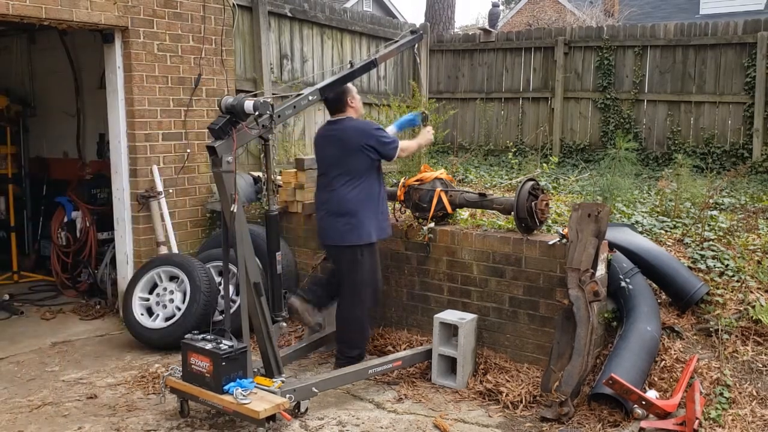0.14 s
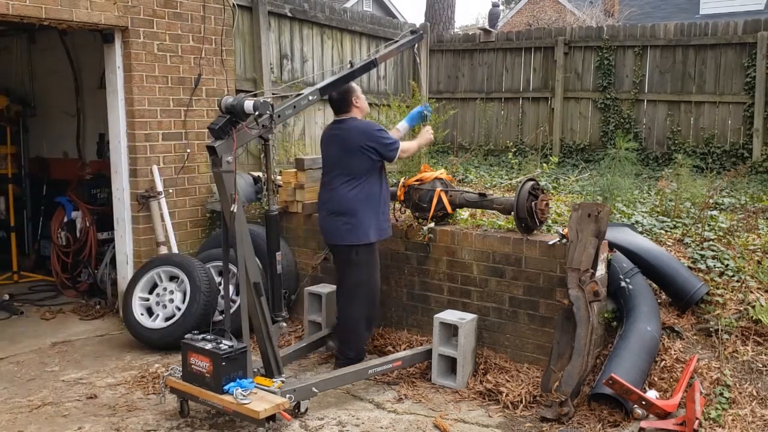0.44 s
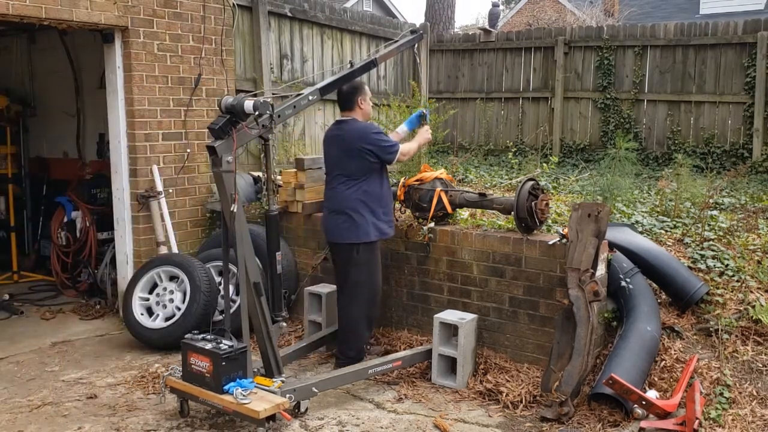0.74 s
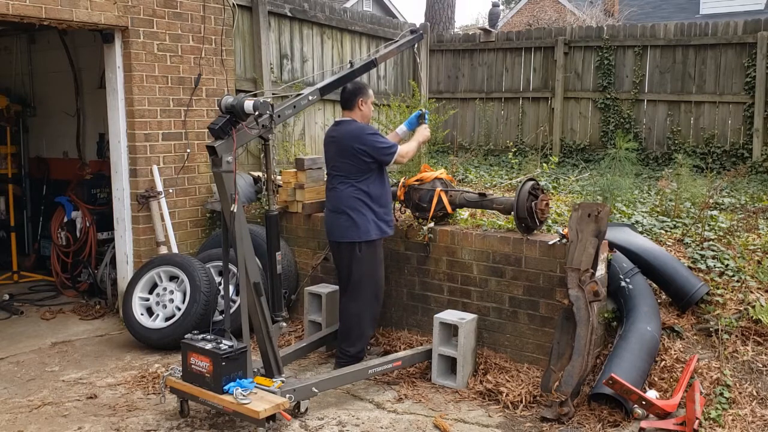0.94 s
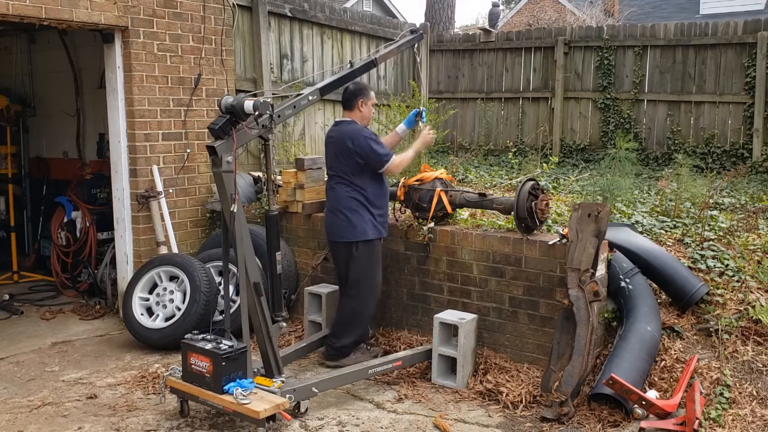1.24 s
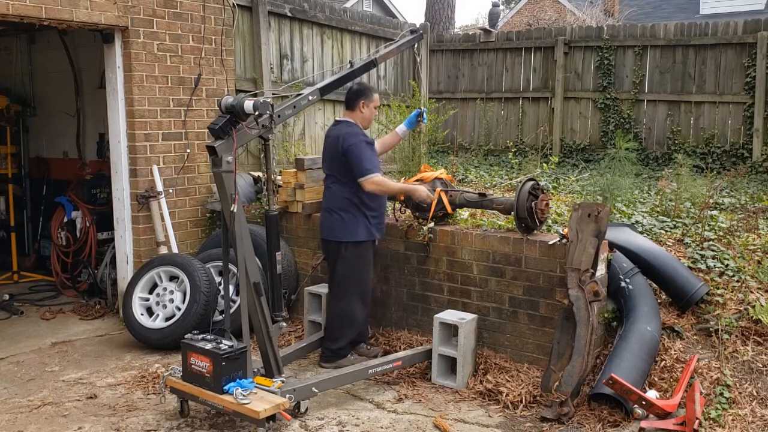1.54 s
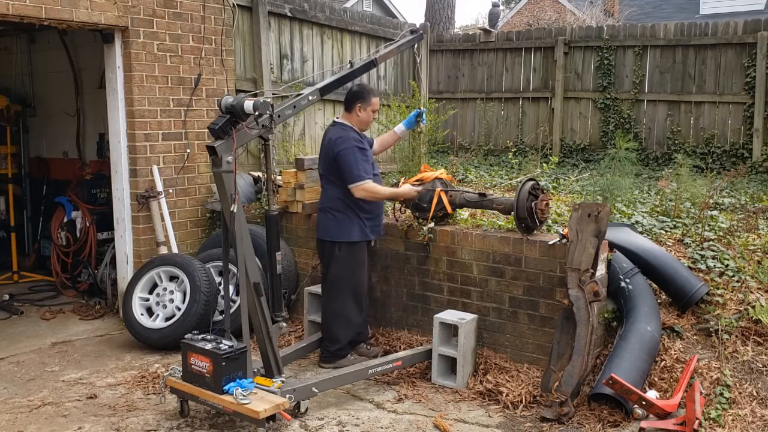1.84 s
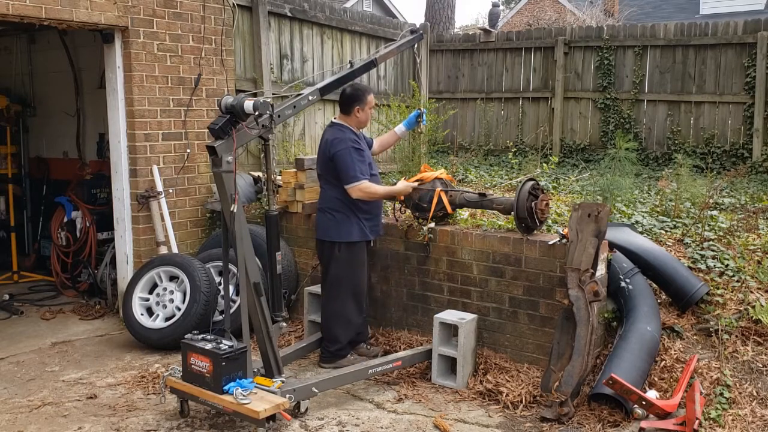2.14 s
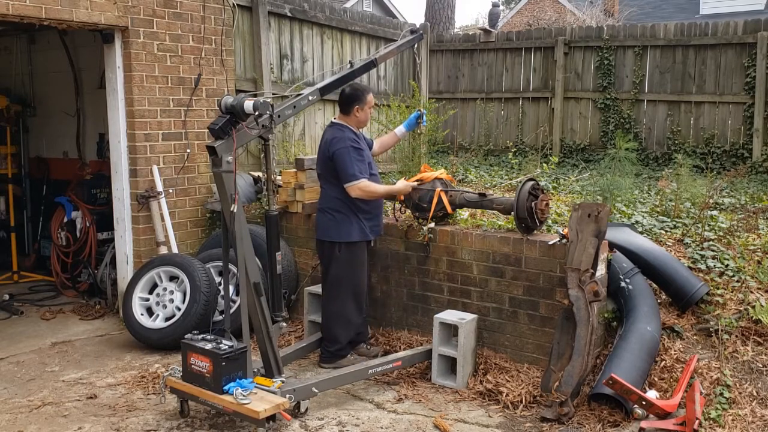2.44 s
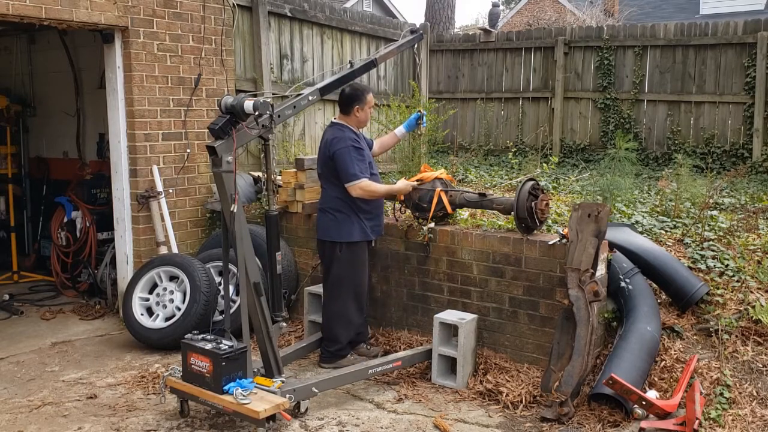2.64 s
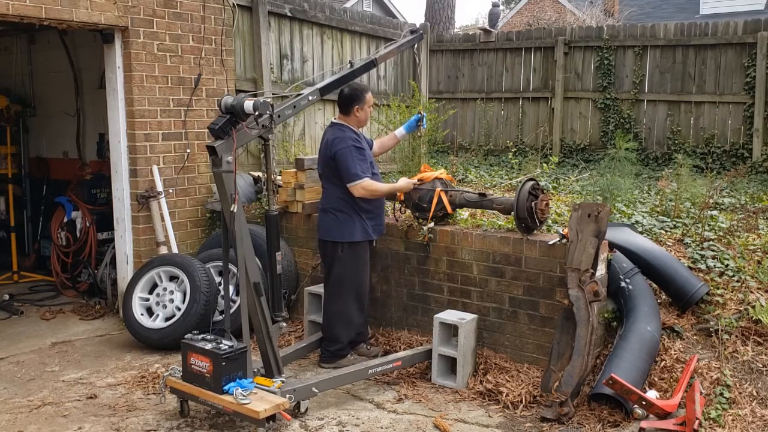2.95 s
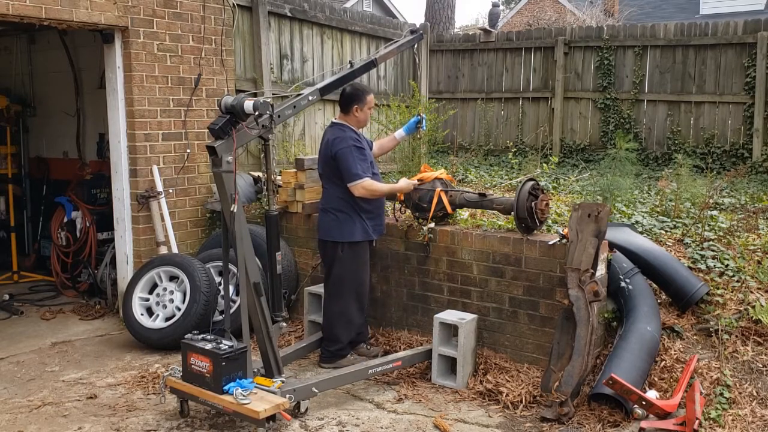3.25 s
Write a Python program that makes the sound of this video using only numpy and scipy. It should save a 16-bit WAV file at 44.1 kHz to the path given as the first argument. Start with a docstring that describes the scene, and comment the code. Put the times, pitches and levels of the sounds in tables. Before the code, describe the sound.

An electric winch jerks briefly, then after strap rustles and hook clinks whirs steadily to the end.

```python
"""An electric winch on a shop crane in a yard by a garage, in light wind that buffets the microphone, mostly on the left.
First the motor gives a short jab: coloured noise jolts over a decaying ring of the housing.
A shoe is set down softly, straps slide and rustle as swelling noise, a steel hook clinks as struck modes, rigging ticks.
Then the switch snaps and the winch spins up to a steady whir: gear-coloured noise and shaft-rate multiples
rattle the housing, under a thin mesh whine of sines."""
import sys
import numpy as np
from scipy import signal
from scipy.fft import rfft, irfft, next_fast_len
from scipy.io import wavfile
from scipy.ndimage import uniform_filter1d, map_coordinates

SR = 44100
rng = np.random.default_rng(int(sys.argv[2]) if len(sys.argv) > 2 else 0)


def generate_wav(sig):
    """Save sig (samples, or channels by samples) to the path in sys.argv[1] as 16-bit PCM at SR."""
    pcm = np.round(np.clip(np.atleast_2d(sig).T, -1, 1) * 32767).astype(np.int16)
    wavfile.write(sys.argv[1], SR, pcm)


N = 149940  # samples
SHAFT_HZ = 31.07  # full speed of the winch shaft

# Broad colour of the gear rattle: f/Hz, relative level/dB
GEAR_COLOUR = [(200, -16.5), (300, -12), (430, -15), (520, -10.5), (720, -6), (950, -4), (1500, 0),
               (2200, -3.5), (2800, -0.5), (3400, 1), (4200, 0.5), (4800, -5.5), (5600, -3.5), (7300, -4),
               (8000, -10), (10500, -11.5), (13000, -15.5), (15500, -18.5)]
# Left-right likeness of the winch noise: f/Hz, correlation [-1..1]
WINCH_ALIKE = [(200, 0.94), (800, 0.83), (2000, 1), (4000, 0.45), (12000, 0.18)]
# Stereo balance of the winch noise: f/Hz, left over right level/dB
WINCH_PAN = [(200, 1), (700, 2.5), (1290, 9.5), (2200, 6), (2950, -6.5), (3300, 2), (4400, -6), (5600, 2),
             (6300, -2), (7200, 4.5), (8500, -1), (13000, -0.5)]
# Left-right likeness of straps and rigging: f/Hz, correlation [-1..1]
RUSTLE_ALIKE = [(300, 0.68), (3000, 0.26), (12000, 0.14)]
# Stereo balance of straps, rigging and shoe: f/Hz, left over right level/dB
RUSTLE_PAN = [(300, -5), (1300, 8), (4400, 0), (15000, -3)]


def amp(db):
    """Decibels to gain."""
    return 10 ** (np.asarray(db) / 20)


def unit(x):
    """Scaled to rms 1."""
    return x / np.sqrt(np.mean(x ** 2) + 1e-20)


def along(points, hz):
    """Values of (f/Hz, value) points, joined on a log frequency axis."""
    f, v = np.transpose(points)
    return np.interp(np.log(hz + 1), np.log(f + 1), v)


def clock():
    """The time of each sample in seconds."""
    return np.arange(N) / SR


def curve(rows):
    """(t/s, value) rows joined by lines."""
    return np.interp(clock(), *np.transpose(rows))


def wobble(rate):
    """A smooth random curve, rate knots a second."""
    knots = rng.standard_normal(int(N * rate / SR) + 4)
    return map_coordinates(knots, [clock() * rate])


def filtered(x, response):
    """x shaped by a response of frequency."""
    m = next_fast_len(N + SR // 2)
    spectrum = rfft(x, m) * response(np.fft.rfftfreq(m, 1 / SR))
    return irfft(spectrum, m)[..., :N]


def rush(colour, alike, pan, lift=lambda hz: 0):
    """Stereo noise of rms 1 with a colour, a left-right likeness and a balance; lift adds dB."""
    def mid_side(hz):
        turn = np.arccos(np.clip(along(alike, hz), -1, 1)) / 2
        return amp(along(colour, hz) + lift(hz)) * [np.cos(turn), np.sin(turn)]

    mid, side = filtered(rng.standard_normal((2, N)), mid_side)
    left_right = np.array([mid + side, mid - side])
    return unit(filtered(left_right, lambda hz: amp(np.outer([.5, -.5], along(pan, hz)))))


def swell(s, db, attack, fall):
    """A bell-shaped rise to a peak at s, then a steady fall in dB per second."""
    t = clock() - s
    rise = np.exp(-.5 * (np.minimum(t, 0) / attack) ** 2)
    return amp(db - fall * np.maximum(t, 0)) * rise


def wind():
    """Gusts thump on the microphone ports as low noise, over a faint outdoor background."""
    # Buffeting colour before a low-pass at 550 Hz: f/Hz, relative level/dB
    buffet_colour = [(13, -47), (22, -3), (43, -4), (70, -3), (122, -11.5), (198, -29), (340, -42.5),
                     (500, -59), (1100, -120)]
    # Balance of the buffeting: f/Hz, left over right level/dB
    wind_pan = [(60, 14.5), (130, 7.6), (300, 3)]
    # Gusts before the wind trim: t/s, level/dB, time from peak to 1/e of the power/s
    gust_rows = [(0.061, -39, 0.036), (0.531, -36, 0.045), (.635, -28, 0.013), (0.704, -34.5, 0.028),
                 (0.796, -29.5, 0.028), (.87, -37, 0.084), (0.936, -25.5, 0.012), (0.992, -34, 0.015),
                 (1.488, -26.5, 0.0092), (1.632, -27, .014), (1.709, -31, 0.031), (1.82, -35.5, 0.02),
                 (1.913, -27.5, 0.0083), (2.004, -31.5, 0.035), (2.126, -27.5, 0.021),
                 (2.225, -29.5, 0.012), (2.55, -39.5, 0.049), (2.8, -43.5, 0.092), (3.2, -52.5, .015)]
    # Outdoor background: f/Hz, relative level/dB
    air_colour = [(88, -35), (150, -4.5), (279, -11), (530, -21), (1910, -36.5), (2500, -40), (7410, -49.5),
                  (8330, -70), (11000, -40.5), (15500, -39)]
    breeze_db, wind_db, air_db = -47, 3, -59.5  # floor between gusts, wind trim, background level
    evenness, cut_hz = .35, 36  # share of chance swings smoothed away; bass cut

    buffet = rush(buffet_colour, [(60, .25)], wind_pan, lambda hz: -10 * np.log10(1 + (hz / 550) ** 6))
    power = np.mean(buffet ** 2, axis=0)
    for _ in range(2):
        power = uniform_filter1d(power, size=900)
    buffet = unit(buffet / (np.abs(power) + 1e-9) ** (evenness / 2))
    gust_power = sum(amp(db) ** 2 * np.exp(-((clock() - s) / width) ** 2) for s, db, width in gust_rows)
    gusts = np.sqrt(amp(breeze_db) ** 2 + gust_power)
    thumps = filtered(amp(wind_db) * gusts * buffet, lambda hz: hz ** 4 / (hz ** 4 + cut_hz ** 4))
    air = rush(air_colour, [(200, .94), (2000, .13), (10000, .1)], [(1000, 1)])
    return thumps + amp(air_db) * air


def footstep():
    """A shoe is set down softly: one short swell of dull, low noise."""
    # The step: t/s, level/dB, attack/s, fall/(dB per s)
    step_row = (.405, -53, .007, 350)
    # Its colour: f/Hz, relative level/dB
    step_colour = [(100, -9), (250, -2), (400, 1), (700, -24), (3000, -33), (10000, -53)]
    return swell(*step_row) * rush(step_colour, WINCH_ALIKE, RUSTLE_PAN)


def ticks():
    """Slack rigging knocks lightly: brief bursts of dull noise."""
    # Ticks: t/s, level/dB, attack/s, fall/(dB per s)
    tick_rows = [(1.178, -47.5, 0.0023, 600), (1.25, -52, 0.0022, 703), (1.421, -55, 0.0029, 700),
                 (1.767, -63.5, 0.0022, 495), (1.945, -67, 0.0031, 696)]
    # Their colour: f/Hz, relative level/dB
    tick_colour = [(300, -5), (1200, -12), (2600, -10.5), (5000, -21), (8000, -24), (15000, -13)]
    return sum(swell(*row) for row in tick_rows) * rush(tick_colour, RUSTLE_ALIKE, RUSTLE_PAN)


def straps():
    """Sliding webbing and cloth: a grainy hiss with scattered snags, over a duller body."""
    # Rustles before grain and snags: peak t/s, hiss level/dB, attack/s, fall/(dB per s), body over hiss level/dB
    rustle_rows = [(0.412, -66, 0.048, 50, -7.5), (0.564, -41, 0.0091, 75, -34),
                   (0.647, -44, 0.043, 94, -3), (.98, -67, 0.029, 37, -12), (1.176, -48, 0.041, 157, -10.5),
                   (1.21, -57.5, 0.04, 109, -2.5), (1.351, -35.5, 0.0073, 850, -10.5),
                   (1.369, -52.5, 0.038, 124, -3), (1.53, -54, 0.026, 118, -10)]
    # Bright hiss: f/Hz, relative level/dB
    hiss_colour = [(1000, -28), (3500, -15), (5500, -11), (7200, 3), (8500, -14.5), (10500, 1.5),
                   (12000, 8.5), (15500, 5.5)]
    # Duller body: f/Hz, relative level/dB
    body_colour = [(200, -10), (500, 0), (900, -5.5), (1600, -1), (2600, -2), (4000, -2.5), (7000, -0.5),
                   (12000, -7)]
    grain_db, snags_per_s, snag_s, snag_db = .5, 140, .0013, -14  # snag_s: decay to 1/e

    hiss_power = sum(swell(s, db, attack, fall) ** 2 for s, db, attack, fall, body in rustle_rows)
    body_power = sum(swell(s, db + body, attack, fall) ** 2 for s, db, attack, fall, body in rustle_rows)
    grain = unit(amp(grain_db * wobble(900) + .71 * wobble(70.64)))
    snag_hits = 1. * (rng.random(N) < snags_per_s / SR)
    snags = unit(signal.lfilter([1], [1, -np.exp(-1 / (snag_s * SR))], snag_hits))
    hiss = np.sqrt(hiss_power) * rush(hiss_colour, RUSTLE_ALIKE, RUSTLE_PAN)
    body = np.sqrt(body_power) * rush(body_colour, RUSTLE_ALIKE, RUSTLE_PAN)
    return (grain + amp(snag_db) * snags) * (hiss + body)


def hook():
    """Touches ring the hook's modes, blurred by chatter; light ones are duller; wall and fence answer."""
    # Touches before the hook trim: t/s, low-tone level/dB, middle-tone level/dB, high-tone level/dB
    clink_rows = [(1.25, -53, -45.5, -53), (1.254, -52, -55, -37.5), (1.257, -41, -43, -50),
                  (1.269, -57, -57, -60), (1.284, -46, -64, -55), (1.458, -53, -76, -52),
                  (1.489, -61, -79, -76), (1.511, -60, -72, -68), (1.525, -46.5, -59, -45.5),
                  (1.558, -55, -70, -69), (1.593, -63, -78, -72), (1.633, -65, -80, -80),
                  (1.652, -65, -82, -80)]
    # Modes of the steel: f/Hz, relative level/dB, t60/s
    hook_modes = [(1780, -11, 0.025), (3128, 1.5, 0.039), (3277, -3.5, 0.062), (4390, 3, 0.033),
                  (6700, -7.5, 0.045), (7450, -1, 0.04), (9870, 2, 0.037), (11870, -1, 0.035)]
    hook_db, attack_s = 2.5, .001
    soft_dulling = 1.7  # dB lost from 7.5 to 15 kHz for each dB below the hardest touch
    chatter_hz, chatter_turns = 200, .14  # knots a second and depth of the random phase
    crack_db, crack_t60_s = -2.5, .018  # noise of the contact
    yard_db, yard_t60_s = -6.5, .2  # echo

    out, t = np.zeros((2, N + SR)), np.arange(SR // 2) / SR
    hardest = max(row[3] for row in clink_rows)
    for s, low, middle, high in clink_rows:
        top = high - soft_dulling * (hardest - high)
        touch = [(3300, low), (4400, middle), (6500, high), (7500, high), (15000, top)]
        ring = 0
        for hz, db, t60 in hook_modes:
            level = amp(db + along(touch, hz) + rng.normal(0, 1) - 60 * t / t60)
            chatter = chatter_turns * wobble(chatter_hz)[:len(t)]
            turns = hz * t + chatter + .66 * rng.random((2, 1))
            ring = ring + level * np.sin(2 * np.pi * turns)
        crack = amp(max(middle, high) + crack_db - 60 * t / crack_t60_s) * rng.standard_normal((2, len(t)))
        clink = ring * (1 - np.exp(-t / attack_s)) + crack
        tail = rng.standard_normal((2, len(t))) * amp(-60 * t / yard_t60_s)
        echo = signal.fftconvolve(clink, tail / np.linalg.norm(tail[0]), axes=1)[:, :len(t)]
        out[:, round(s * SR):][:, :len(t)] += amp(hook_db) * (clink + amp(yard_db) * echo)
    return out[:, :N]


def housing(hz):
    """Lift in dB from the resonances of the winch housing and crane, and the hollows between them."""
    # Resonances before sharpening: f/Hz, width/Hz, lift/dB
    resonances = [(528, 22, 5), (591, 22, 6), (878, 22, 6), (940, 20, 4), (1035, 25, 3), (1185, 22, 4),
                  (1690, 50, 3.5), (2010, 60, 3.5), (2383, 25, 4), (2630, 55, 5.5), (2955, 50, 4.5),
                  (3172, 24, 6), (3305, 28, 8), (3592, 42, 6), (3854, 42, 6.5), (4014, 28, 4),
                  (4475, 50, 5), (5520, 130, 6), (6277, 36, 8), (6810, 80, 5), (7257, 50, 5),
                  (11800, 300, 4)]
    # Hollows: f/Hz, width/Hz, lift/dB
    hollows = [(690, 30, -5), (770, 25, -4), (972, 24, -8), (1375, 30, -4), (1860, 40, -4), (2300, 25, -4),
               (3675, 32, -7), (5350, 110, -5), (5640, 35, -6)]
    trim_db, sharpen = -1.5, 1.45

    def bumps(rows):
        return sum(db / (1 + (2 * (hz - f) / width) ** 2) for f, width, db in rows)

    return trim_db + sharpen * bumps(resonances) + bumps(hollows)


def jab():
    """A brief jerk of the motor jolts the gears and leaves the housing ringing."""
    # Jolts: t/s, level/dB, attack/s, fall/(dB per s)
    jolt_rows = [(.003, -42.5, 0.0027, 178), (0.021, -35.5, 0.0024, 350), (.112, -52, 0.005, 260)]
    # Their colour before the housing lift: f/Hz, relative level/dB
    jolt_colour = [(200, -19.5), (420, -12), (590, -6.5), (750, -3), (1200, -10), (1900, -1.5),
                   (2500, -1.5), (3400, 2), (4200, -2), (4800, -11.5), (7400, -7), (8200, -21.5),
                   (15500, -14.5)]
    # Housing ring: f/Hz, peak level/dB before the onset fade, t60/s
    ring_modes = [(592, -37.5, .13), (860, -44, .09), (1520, -44, .09), (1906, -41, .13), (2164, -38, .09),
                  (3058, -38, .12), (3558, -37, .13), (4091, -41, .11), (7200, -49, .12)]

    t = np.maximum(clock() - .018, 0)  # s since the ring began
    ring = sum(amp(db - 60 * t / t60) * np.sin(2 * np.pi * hz * t + .5 * wobble(87))
               for hz, db, t60 in ring_modes)
    ring = ring * (1 - np.exp(-t / .0016))
    jolts = sum(swell(*row) for row in jolt_rows)
    return ring + jolts * rush(jolt_colour, WINCH_ALIKE, WINCH_PAN, housing)


def relay():
    """The motor switch snaps: a short burst of bright noise."""
    # Snaps: t/s, level/dB, attack/s, fall/(dB per s)
    snap_rows = [(2.041, -44, 0.0046, 301)]
    # Their colour: f/Hz, relative level/dB
    snap_colour = [(300, -21.5), (1400, -12.5), (4000, -16.5), (7300, 1.5), (8500, 3), (15000, -0.5)]
    return sum(swell(*row) for row in snap_rows) * rush(snap_colour, WINCH_ALIKE, WINCH_PAN)


def ripple(hz):
    """Fine steady peaks and dips in dB, from reflections off wall and ground."""
    spacing_hz, depth_db = 19, 1.6
    knots = np.arange(0, SR / 2, spacing_hz)
    return depth_db * np.interp(hz, knots, rng.standard_normal(len(knots)))


def knocks():
    """Gain of the rattle: now and then a tooth takes up its slack and hits harder."""
    per_s, decay_s, depth = 70, .0016, .75
    hits = (rng.random(N) < per_s / SR) * (.5 + rng.random(N))
    return unit(1 + depth * signal.lfilter([1], [1, -np.exp(-1 / (decay_s * SR))], hits))


def gear_train(angle):
    """Fluttering tones on the multiples of the shaft rate, coloured by the housing, at rms 1."""
    flutter_db, jitter, housing_share = 4, 1.2, .55  # jitter in radians
    t, knots = clock(), np.arange(0, N / SR + 1, 1 / 28)

    def chance():
        return np.interp(t, knots, rng.standard_normal(len(knots)))

    orders = np.arange(16, 146)
    hz = orders * SHAFT_HZ
    gains = amp(along(GEAR_COLOUR, hz) + housing_share * housing(hz))
    tones = 0
    for k, gain in zip(orders, gains):
        level = gain * amp(flutter_db * chance())
        phase = k * angle + 2 * np.pi * rng.random() + jitter * chance()
        tones = tones + level * np.sin(phase)
    return unit(tones)


def running():
    """The shaft spins up; tooth rattle swells once a turn and the mesh whines on multiples of its rate."""
    # Running level before the rattle and whine trims: t/s, level/dB
    run_level = [(2.036, -56), (2.047, -42.5), (2.082, -32), (2.228, -28), (3.062, -31), (3.184, -33),
                 (3.206, -30.5), (3.22, -32), (3.4, -33)]
    # Mesh whine before its trim: multiple of the shaft rate, level over the running level/dB
    mesh_tones = [(32, -20.5), (48, -17.3), (95, -15.5), (143.5, -22)]
    start_s, spin_up_s, wander = 2.036, .036, .001  # switch-on, time constant, share of speed
    orders_db, rattle_db, whine_db = -5.5, 2, 1.8
    rough_db, sway_db, grind_db, flutter_db = -1, .35, -.44, 2.2  # depths of the random level swings
    turn_depth = .09

    age = np.maximum(clock() - start_s, 0)
    speed = (1 - np.exp(-age / spin_up_s)) * (1 + wander * wobble(11))
    angle = 2 * np.pi * np.cumsum(SHAFT_HZ * speed) / SR

    teeth = rush(GEAR_COLOUR, WINCH_ALIKE, WINCH_PAN, lambda hz: housing(hz) + ripple(hz))
    rattle = unit(teeth + amp(orders_db) * gear_train(angle))
    treble = filtered(rattle, lambda hz: 1 - 1 / (1 + (hz / 2300) ** 2))
    rattle = rattle + treble * (amp(grind_db * wobble(90)) - 1)  # the treble flickers
    swings = amp(rattle_db + rough_db * wobble(500) + sway_db * wobble(25.05))
    rattle = rattle * knocks() * (1 + turn_depth * np.cos(angle)) * swings

    whine = 0
    for k, db in mesh_tones:
        level = np.sqrt(2) * amp(db + flutter_db * wobble(21.76))
        whine = whine + level * np.sin(k * angle + .29 * wobble(42))
    whine = amp(whine_db) * speed ** 2 * whine
    return (age > 0) * amp(curve(run_level)) * (rattle + whine)


def winch():
    """The opening jab, the switch and the steady run, reaching the left microphone first."""
    lead_s = .076 / 10 ** 3
    # half the lead advances the left side, half delays the right
    return filtered(jab() + relay() + running(),
                    lambda hz: np.exp(1j * np.pi * np.outer([1, -1], hz) * lead_s))


def scene():
    """Wind, shoe, rigging, straps, hook and winch together."""
    return wind() + footstep() + ticks() + straps() + hook() + winch()


def record(dry):
    """A sharp band limit: nothing passes from 15850 Hz up."""
    return filtered(dry, lambda hz: hz < 15850)


dry = scene()
out = record(dry)
generate_wav(out)
```